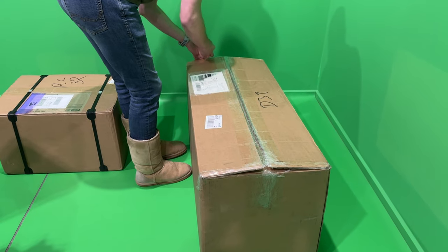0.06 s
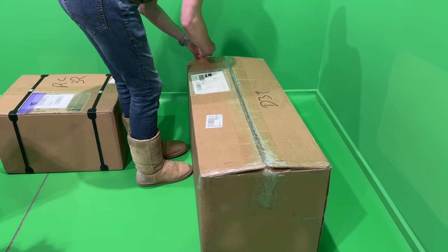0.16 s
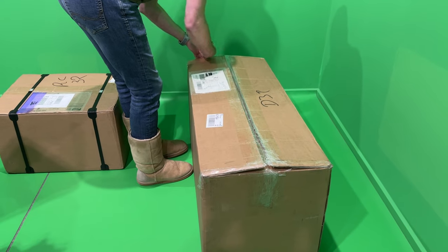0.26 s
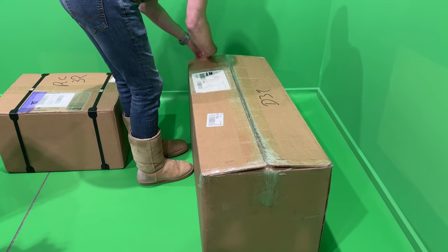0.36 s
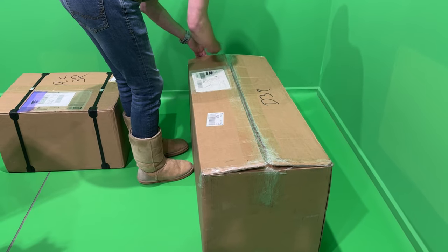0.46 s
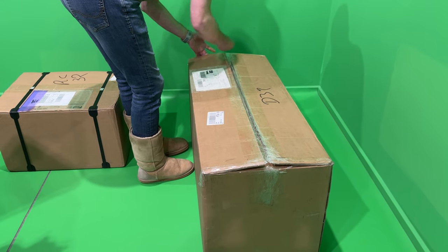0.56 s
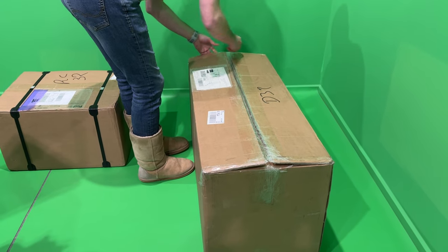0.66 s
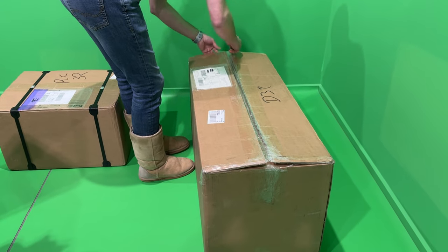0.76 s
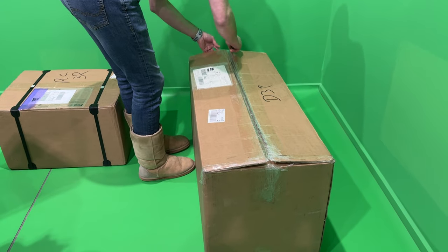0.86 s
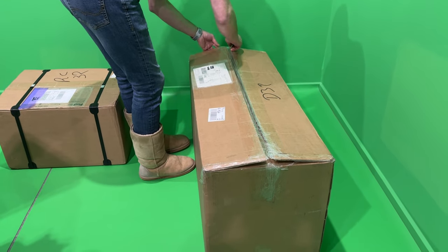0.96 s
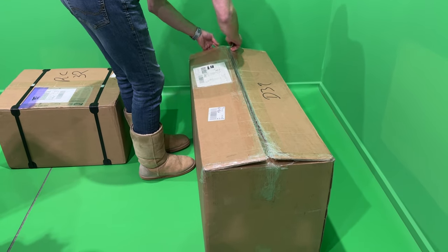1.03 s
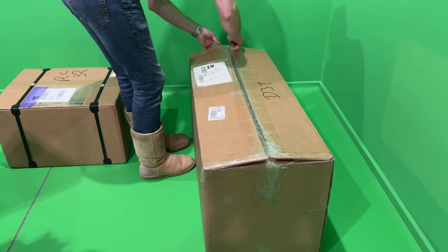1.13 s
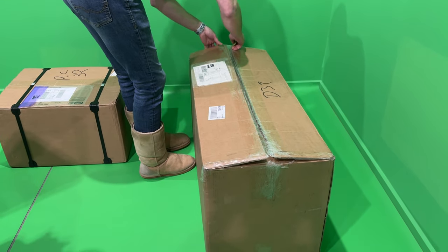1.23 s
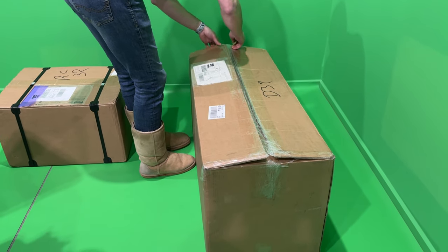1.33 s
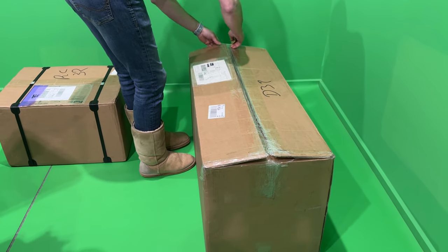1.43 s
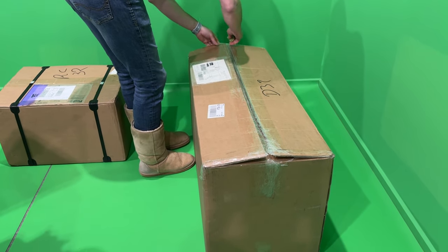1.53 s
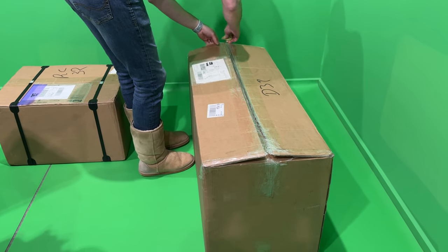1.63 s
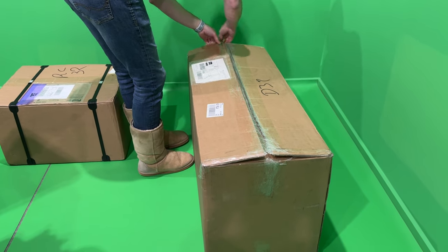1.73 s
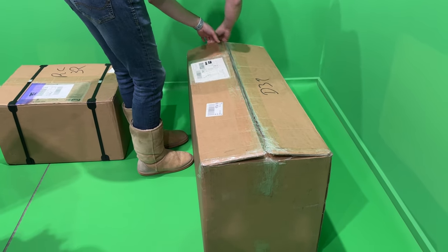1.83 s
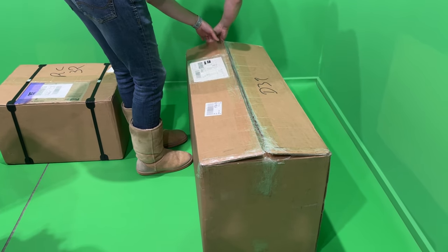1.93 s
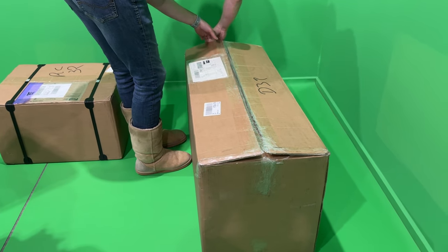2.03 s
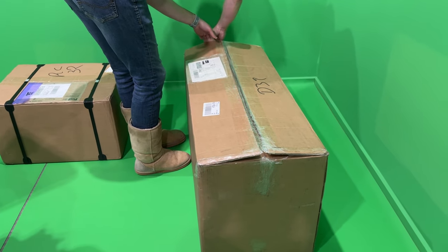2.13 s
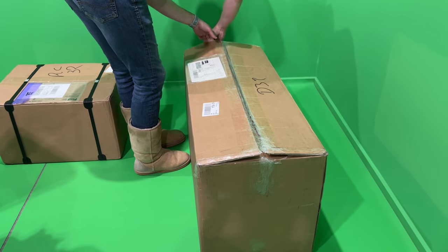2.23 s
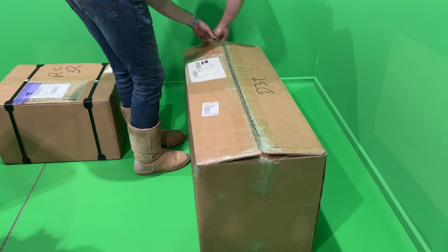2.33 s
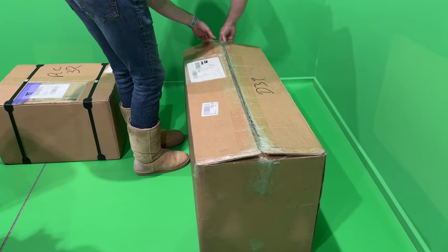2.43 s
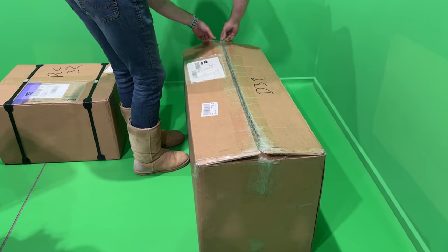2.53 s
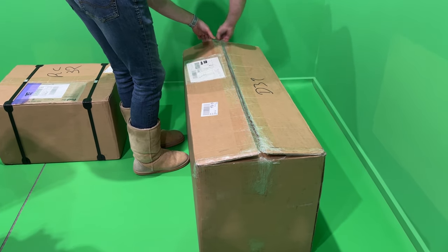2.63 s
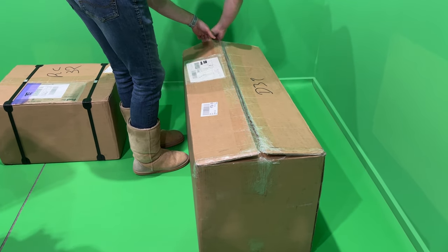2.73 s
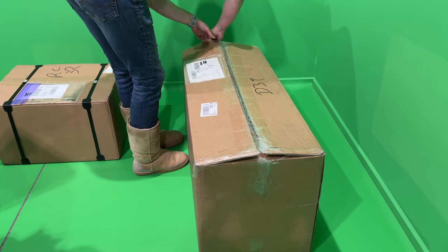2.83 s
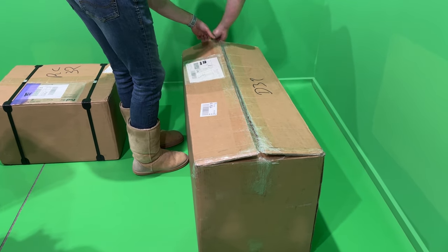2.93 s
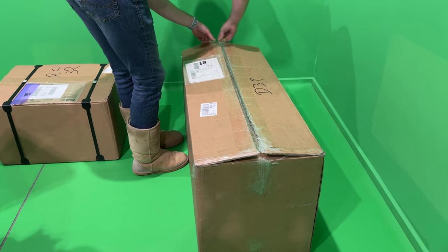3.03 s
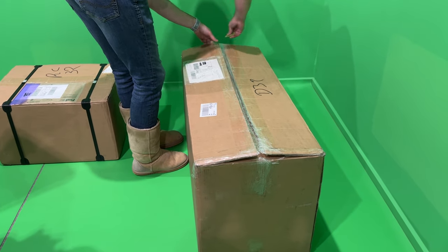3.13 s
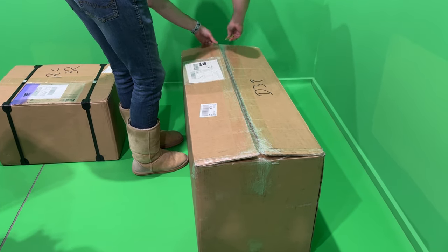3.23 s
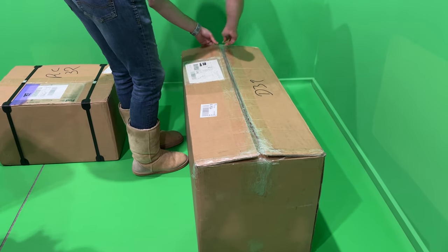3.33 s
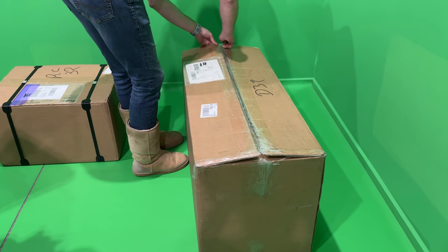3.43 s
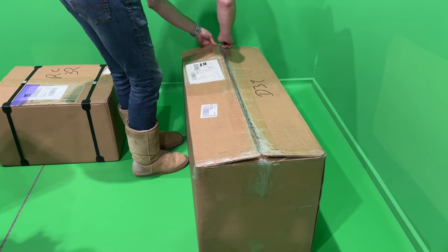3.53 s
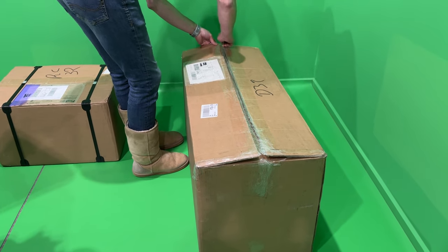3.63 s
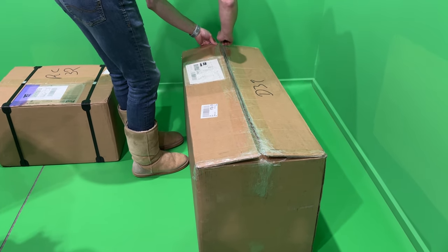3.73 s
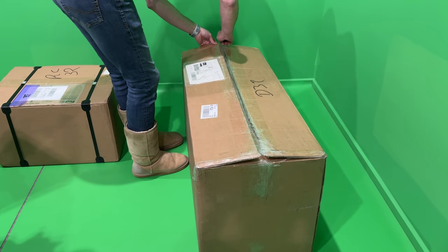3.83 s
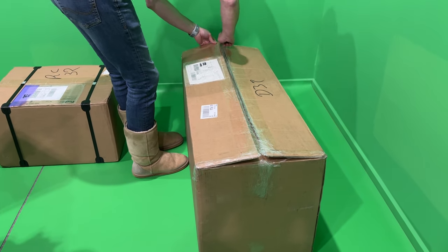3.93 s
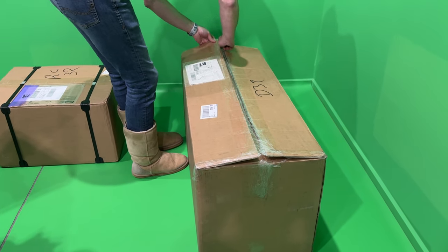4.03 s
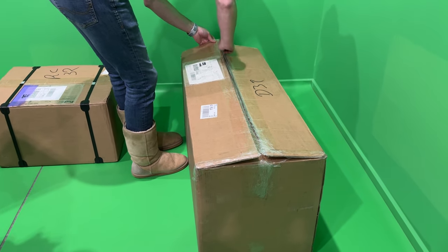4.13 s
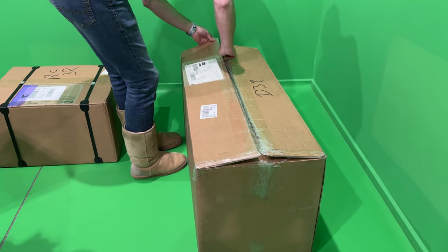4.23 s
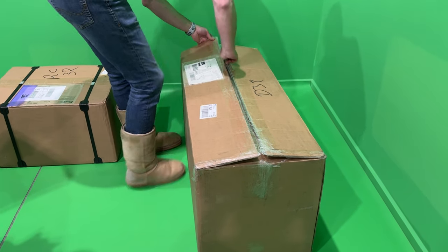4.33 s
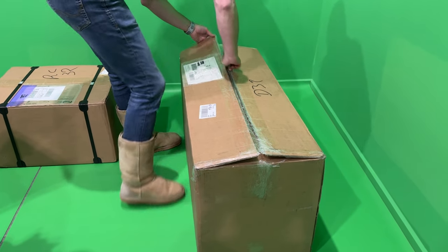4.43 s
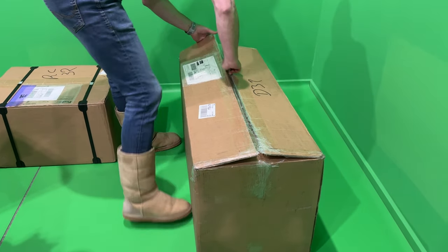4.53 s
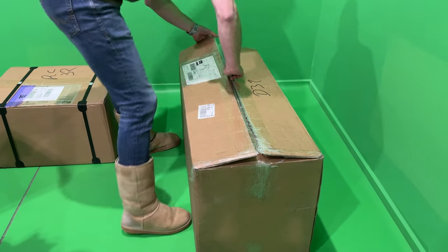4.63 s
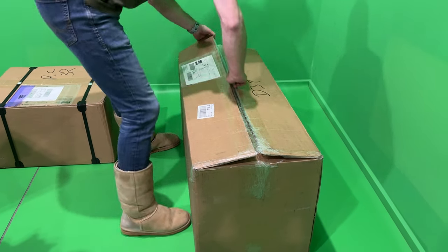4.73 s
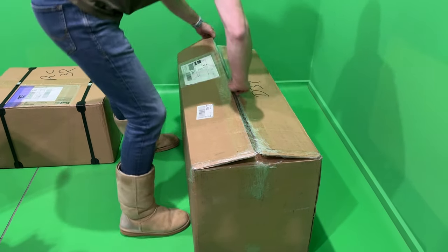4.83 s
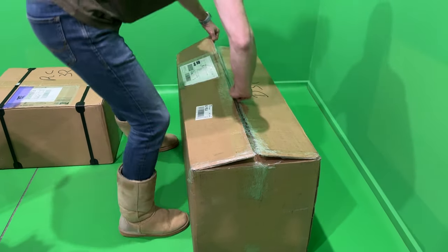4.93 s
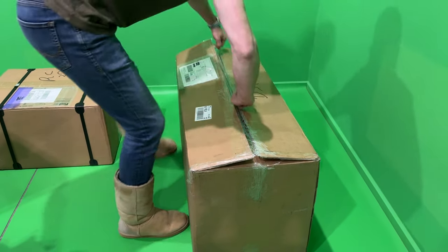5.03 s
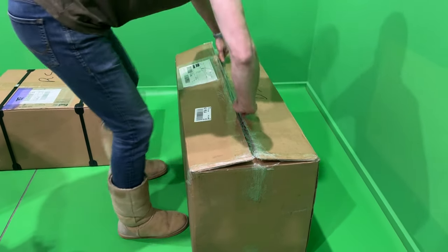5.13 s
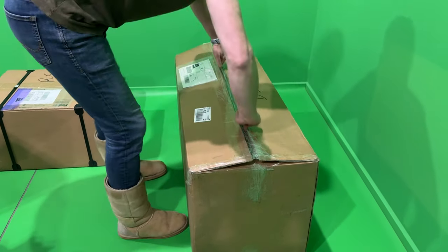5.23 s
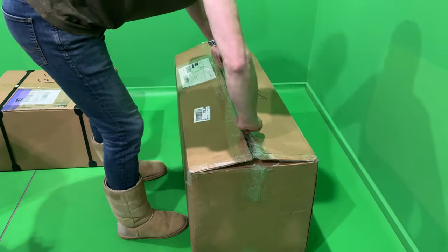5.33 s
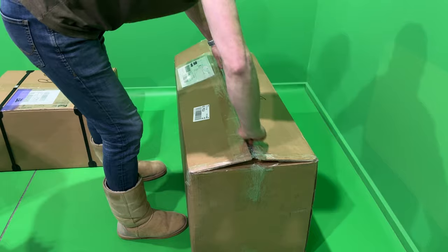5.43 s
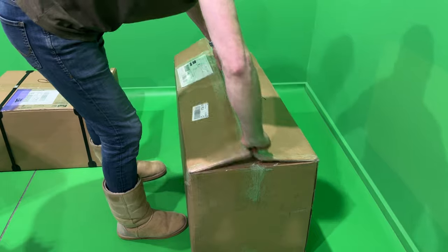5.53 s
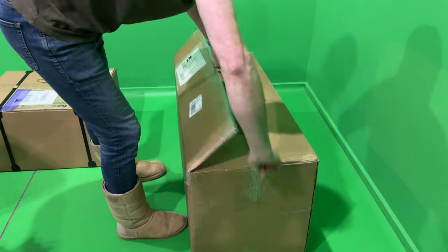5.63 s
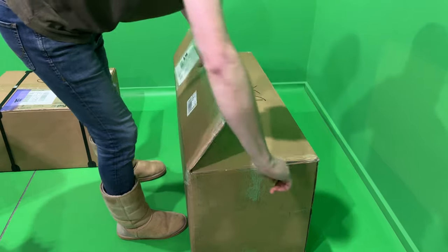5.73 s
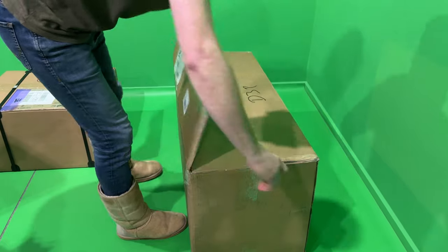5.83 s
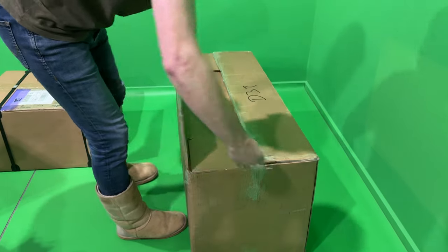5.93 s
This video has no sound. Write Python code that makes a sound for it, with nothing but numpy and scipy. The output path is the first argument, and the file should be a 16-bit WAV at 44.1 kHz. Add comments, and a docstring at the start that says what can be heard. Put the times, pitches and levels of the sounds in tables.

```python
"""Small scratchy rubs and clicks grow into loud cracking snaps with hollow booms, over a low steady hum.
Fingers pick at the tape on a big cardboard box, then a fist runs down the seam and the flaps lift.
Snaps are short bursts of noise, rubbing is a stream of grains and booms are slow pushes of air;
all of them ring resonances of the box. A small bare room rings after it, with ventilation behind;
a phone with two ports listens."""
import sys
import numpy as np
from scipy import signal
from scipy.fft import rfft, irfft, next_fast_len
from scipy.io import wavfile

SR = 44100
rng = np.random.default_rng(int(sys.argv[2]) if len(sys.argv) > 2 else 0)


def unload_audio(sound):
    """Save the sound as a 16-bit wav file, at the path given as the first command line argument."""
    columns = np.transpose(np.atleast_2d(sound))
    # keep every value between -1 and 1, then stretch to whole-number steps
    steps = np.round(np.clip(columns, -1, 1) * 32767)
    wavfile.write(sys.argv[1], SR, steps.astype(np.int16))


N = 263277      # length in samples

# tape letting go: t/s, base level/dB, brightness/dB, knock/dB, thump/dB, board pitch/Hz, thump pitch/Hz,
# tear decay time/ms, shudder/dB; brightness, knock, thump and shudder are relative to the base level
TAPE_SNAPS = [(0.5231, -51.5, 2, -23, -16, 926, 148, 2.9, -16),
              (0.8378, -31.5, -10.5, -16, -12, 2610, 170, 2.5, -21),
              (0.9266, -51, -3, -17, 8, 1810, 147, 3.3, -20.5),
              (0.9889, -32, -6.5, -29, -32, 1730, 108, 2.8, -15),
              (1.1334, -49, -1.5, -18, -7, 1790, 218, 4.2, -19),
              (1.26, -30.5, -9, -11, -9, 1360, 212, 3.2, -19),
              (1.29, -34.5, -14, -12.5, -6.5, 902, 270, 3.6, -19),
              (1.4262, -45, -5, -24, 3, 1670, 148, 4.3, -20),
              (1.5334, -49, -5.5, -25, -13, 2420, 145, 3.6, -31),
              (1.5829, -47.5, 3.5, -19, -13, 2440, 91.5, 3.3, -13),
              (1.7979, -64.5, 9.5, -14, 9, 1400, 132, 3.1, -22),
              (2.0244, -55.5, -2, -17, -9, 1390, 135, 2.8, -19),
              (2.141, -52, -9.5, -20, -6, 960, 86.1, 2.2, -19),
              (2.2548, -46.5, -8, -21, -32, 2410, 86.1, 3.4, -22),
              (2.3298, -32, -15.5, -12, -5, 1530, 99.6, 4.4, -14),
              (2.3381, -17.5, -15.5, -16.5, -9, 1240, 282, 3.13, -13),
              (2.7273, -36, -9.5, -19, -38, 1350, 86.1, 4, -22),
              (2.798, -32, -18.5, -6, -1.5, 1040, 124, 4.8, -16.5),
              (3.1464, -57, 2, -10, 1, 1710, 88.8, 6, -14),
              (3.1837, -59.5, 8.5, -7, -11, 1640, 86.1, 3.9, -17),
              (3.423, -48, -21, -14, -4.5, 1070, 152, 4.2, -25),
              (3.6862, -66.5, 12, -19, -12, 1560, 84.6, 2.5, -19),
              (3.709, -47, -3, -20, -29, 1620, 127, 2.7, -19),
              (3.7187, -37.5, -8, -25, -37, 1560, 85, 3.4, -23),
              (3.889, -50.5, -3, -11, -13, 1440, 275, 3, -24),
              (3.9332, -6, -13.5, -17.5, -21.5, 1400, 323, 3.74, -18.5),
              (3.9602, -3.5, -11, -18, -16, 1920, 154, 2.86, -19.5),
              (3.9808, -6.5, -17, -17.5, -22, 1510, 185, 3.3, -20),
              (4.1803, -23.5, -28, -29, -34, 1750, 116, 3.4, -17),
              (4.2297, -27, -8.5, -12, -10.5, 920, 283, 4.1, -20),
              (4.3134, -34.5, -12, -11, -2, 1025, 135, 5.5, -22),
              (4.3764, -10, -9.5, -13.5, -15, 1440, 134, 3.4, -20.5),
              (4.4348, -20, -11.5, -15.5, -12.5, 1720, 113, 2.8, -25),
              (4.5137, -37.5, 0, -10, -19, 2050, 156, 3.6, -26),
              (4.5505, -32.5, -10, -16, -4, 1850, 123, 3.6, -28),
              (4.5816, -30, -5, -11.5, -9, 929, 124, 1.6, -23),
              (4.6204, -28.5, -19, -38, -24, 1250, 91.5, 4.2, -15),
              (4.6655, -25, -17.5, -18.5, -3.5, 1270, 130, 3.6, -17),
              (4.7131, -37, -15, 2.5, 2, 1240, 153, 6.1, -18),
              (4.8307, -52.5, 14, -10, -25, 1640, 86.1, 2.7, -21),
              (4.9395, -53.5, 5, -17, -34, 1650, 135, 3.6, -22),
              (4.994, -24, -16.5, -21, -27, 1600, 120, 3.9, -18),
              (5.1141, -24.5, -22.5, -19, -13, 1590, 122.3, 3.4, -21),
              (5.2104, -31.5, -6.5, -6, -2.5, 1500, 155, 2.8, -19.5),
              (5.3686, -15.5, -10.5, -9, -2.5, 1700, 121, 2.15, -19),
              (5.5478, -15, -7.5, -13.5, -3.5, 1590, 174, 3.9, -17.5),
              (5.5584, -8.5, -45, -11, -6.5, 1540, 121, 3.95, -18.5)]
# resonances of each part of the box, all with columns: f/Hz, width/Hz, relative level/dB
# bright scuffing and the fizz above it
SCUFF_MODES = [(2830, 210, 2.5), (3735, 480, -3), (4770, 1540, -3.5), (5720, 1220, -2.5), (8346, 2000, 1.5)]
SIZZLE_MODES = [(8584, 1900, 10), (12050, 2560, 3), (12800, 8700, -3.5)]
# rattle of the corrugated board: f/Hz, width/Hz, relative level/dB
BOARD_MODES = [(1018, 101, 3), (1158, 61, -4.5), (1223, 41, -3.5), (1443, 336, 3), (1668, 95, 2.5),
               (1792, 130, 0.5), (1946, 110, -3.5), (2138, 140, -1.5), (2386, 470, -6)]
# knock of the box walls: f/Hz, width/Hz, relative level/dB
WALL_MODES = [(446, 23, -3.5), (518, 185, -2), (669, 130, -3), (765, 160, -4), (902, 10, -7.5)]
# thump of the large panels: f/Hz, width/Hz, relative level/dB
PANEL_MODES = [(90.6, 5.1, 1.5), (125, 13.7, 3), (157, 19.3, -4), (198, 16.4, -2.5), (268.3, 39.4, -1.5),
               (318, 69, -6)]
# air in the hollow box: f/Hz, width/Hz, relative level/dB
HOLLOW_MODES = [(48.7, 8.1, 5), (60, 9.3, -21)]


def snaps():
    """Every snap is a short dying tear of noise for the stiff parts and a soft push for the panels."""
    rise_share = 0.25       # rise time as a share of the tear's decay time
    sizzle_tilt = 1.4       # dB of sizzle per dB of brightness
    size = SR // 10
    t = np.arange(size) / SR
    s, db, bright_db, knock_db, thump_db, board_hz, thump_hz, tear_ms, _ = np.transpose(TAPE_SNAPS)
    age = 1000 * t / tear_ms[:, None, None]     # in decay times
    outline = (1 - np.exp(-age / rise_share)) * np.exp(-age)
    tears = rng.standard_normal((len(s), 2, size)) * outline
    for _ in range(3):      # a tear is even in colour: no pitch stands out
        spectrum = rfft(tears)
        even = irfft(spectrum / np.abs(spectrum), size)
        tears = even * outline ** 0.16
    wanted_energy = np.sum(outline ** 2, axis=-1, keepdims=True)
    energy = np.sum(tears ** 2, axis=-1, keepdims=True)
    tears = tears * np.sqrt(wanted_energy / energy)

    # the size of the torn patch favours a band of its own, a little under an octave wide
    patches = []
    for hz, tear in zip(board_hz, tears):
        b, a = signal.butter(2, [0.72 * hz, 1.304 * hz], "band", fs=SR)
        patches.append(signal.lfilter(b, a, tear))
    push = t / 0.00064 * np.exp(1 - t / 0.00059)
    thumps = []
    for hz in thump_hz:
        b, a = signal.butter(1, [0.56 * hz, 1.5 * hz], "band", fs=SR)
        thumps.append(signal.lfilter(b, a, push))

    parts = [(BOARD_MODES, db + 5.5, patches),
             (SCUFF_MODES, db + bright_db + 13.5, tears),
             (SIZZLE_MODES, db + sizzle_tilt * bright_db + 15.0, tears),
             (WALL_MODES, db + knock_db + 10.5, tears),
             (PANEL_MODES, db + thump_db + 1.0, thumps)]
    return sum(resonate(placed(s, level_db, shapes), modes, uneven_db=2.5)
               for modes, level_db, shapes in parts)


def booms():
    """The whole box flexes and pumps its air: a slow push rings the resonances of the hollow."""
    # pushes on the air: t/s, level/dB
    air_pushes = [(0.93, -50), (1.748, -48), (2.4, -48), (4.02, -39), (4.299, -40.5), (4.388, -33.5),
                  (4.45, -64), (4.58, -56), (4.679, -41), (5.15, -42), (5.29, -39), (5.376, -28),
                  (5.431, -26), (5.556, -23.5), (5.801, -51)]
    t = np.arange(SR // 10) / SR
    s, db = np.transpose(air_pushes)
    push = t / 0.0046 * np.exp(1 - t / 0.0027)
    return resonate(placed(s, db - 2.5, [push] * len(s)), HOLLOW_MODES, uneven_db=4.5)


def rubbing():
    """Fibres and glue give way in clumps of uneven grains; the same friction shakes the panels."""
    # hands and flaps rubbing throughout: t/s, rustle level/dB, load on the box relative to the rustle/dB
    rub_path = [(0.0, -71, 14.5), (0.45, -96.5, 27.5), (0.71, -63.5, 4), (1.03, -56, 4), (1.49, -61.5, 5.5),
                (1.89, -69.5, 7), (2.39, -74, 12), (2.58, -83, 13.5), (3.42, -66.5, 7), (3.72, -82, -7),
                (3.94, -58, 14), (4.09, -43.5, 3.5), (4.42, -46, 6.5), (4.75, -50, 5.5), (5.2, -51, 0.5),
                (5.54, -40.5, 9), (5.7, -54.5, 8), (5.97, -44.5, -4)]
    # single strokes of a hand: middle t/s, length/s, rustle level/dB, load relative to the rustle/dB
    hand_strokes = [(0.345, 0.017, -71, 4), (0.684, 0.089, -54, 1.5), (0.828, 0.029, -65, 8),
                    (1.018, 0.058, -54.5, -11), (1.446, 0.045, -44.5, -2), (2.035, 0.022, -54, -19),
                    (2.152, 0.028, -60, 7), (2.3, 0.052, -55.5, -8), (2.93, 0.12, -63.5, 3),
                    (3.272, 0.06, -51, -3), (3.451, 0.046, -59.5, 13.5), (3.74, .06, -80, 6),
                    (3.94, 0.066, -37, 0.5), (4.218, 0.044, -41, 2), (4.324, 0.043, -42.5, 8.5),
                    (4.595, 0.05, -48.5, 10.5), (4.71, 0.077, -57, 20.5), (5.15, 0.075, -43.5, 9.5),
                    (5.256, 0.077, -55, 17.5), (5.407, 0.079, -37, 1.5), (5.62, 0.073, -50.5, 18.5)]
    # how strongly rubbing drives each part: part name, level/dB
    mix_db = {"sizzle": 3, "board": -6, "wall": -9, "panel": -5, "hollow": -2}
    grains_per_s, grain_spread_db, clump_db = 1200, 3.5, 7     # typical rate, uneven sizes, uneven rate
    shudder_s = 0.032       # decay time of the board's shudder after a snap
    t = np.arange(N) / SR
    s, rustle_db, load_db = np.transpose(rub_path)
    rustle = from_db(np.interp(t, s, rustle_db))
    load = from_db(np.interp(t, s, rustle_db + load_db))
    for middle, length, db, load_db in hand_strokes:
        swell = from_db(db) * np.exp(-(2 * (t - middle) / length) ** 2)
        rustle = rustle + swell
        load = load + swell * from_db(load_db)

    # after each snap the box goes on shuddering
    s, db, bright_db, knock_db, thump_db, *_, shudder_db = np.transpose(TAPE_SNAPS)
    db = db + shudder_db
    dying = [np.exp(-t[:SR // 2] / shudder_s)] * len(s)
    shudder = placed(s, db, dying)
    heavy = placed(s, db + thump_db + 19.5, dying)
    knocking = placed(s, db + knock_db + 19.5, dying)
    rustle = rustle + placed(s, db + bright_db + 0.5, dying)

    # grains fall at chance moments, up or down, with a few much bigger than the rest
    sizes = from_db(grain_spread_db * np.minimum(rng.exponential(1, (2, N)), 4))
    sizes = sizes * rng.choice([-1, 1], (2, N))
    per_s = grains_per_s * from_db(clump_db * drift(35.0, count=1))
    grains = rms_one(sizes * (rng.random((2, N)) < per_s / SR))

    out = resonate(grains * rustle, SCUFF_MODES, uneven_db=0.0)
    parts = [(SIZZLE_MODES, "sizzle", rustle),
             (BOARD_MODES, "board", load + shudder),
             (WALL_MODES, "wall", load + knocking),
             (PANEL_MODES, "panel", load + heavy),
             (HOLLOW_MODES, "hollow", load)]
    for modes, name, force in parts:
        out = out + resonate(grains * force * from_db(mix_db[name]), modes, uneven_db=2.0)
    return out


def room(x):
    """Direct sound, then a diffuse tail of noise that dies at its own pace in each half-octave band."""
    # ringing of the room: f/Hz, time to fall 60 dB/s, tail level/dB
    ringing = [(50.3, 0.41, -4.5), (162, 0.24, -6), (453, 0.4, 0), (1060, 0.34, -3), (3030, 0.54, 3.5),
               (8100, 0.54, -5.5), (14900, 0.22, 2)]
    build_up_s = 0.0011     # the tail fades in over this time
    size = SR
    t, tail = np.arange(size) / SR, 0
    for low in 30 * np.sqrt(2) ** np.arange(18):
        band = signal.butter(2, [low, low * np.sqrt(2)], "band", fs=SR, output="sos")
        decay = from_db(-60 * t / at_hz(ringing, low * 1.67))
        noise = signal.sosfilt(band, rng.standard_normal((2, size)))
        part = noise * decay * np.clip(t / build_up_s, 0, 1)
        level = from_db(at_hz(ringing, low * 0.63, column=2))
        tail = tail + level * part / np.sqrt(np.sum(decay ** 2))
    long = next_fast_len(N + size)
    direct = np.array([[1], [1j]])      # the difference of two close ports is a quarter cycle off their sum
    response = two_ports(direct + rfft(tail, long), np.fft.rfftfreq(long, 1 / SR))
    return irfft(response * rfft(x, long), long)[:, :N]


def ventilation():
    """A steady low rumble with a soft rush of air near 1.5 kHz, made of noise shaped in pitch."""
    # colour of the hum: f/Hz, relative level/dB
    hum_colour = [(25, -34), (50, -5), (76, 0.5), (108, -22), (141, -3.5), (175, -19), (350, -19),
                  (560, -26.5), (850, -29.5), (1200, -23.5), (2000, -24.5), (2600, -45), (3600, -46),
                  (16000, -46)]
    hum_db = -53.5      # average (RMS) level of the hum
    hz = np.fft.rfftfreq(N, 1 / SR)
    pair = rfft(rng.standard_normal((2, N))) * from_db(at_hz(hum_colour, hz))
    return from_db(hum_db) * rms_one(irfft(two_ports(pair, hz), N))


def two_ports(spectrum_of_pair, hz):
    """Mixes two spectra into left and right with the likeness and tilt of each pitch."""
    # how alike left and right are: f/Hz, likeness (0 to 1)
    likeness = [(40, 1), (130, 0.95), (290, 0.84), (640, 0.31), (1410, 0.36), (3100, 0.024), (6820, 0.42)]
    # balance of the two ports: f/Hz, left minus right/dB
    balance = [(60, -0.5), (110, -1.0), (200, -0.5), (380, -0.5), (700, -1.0), (1290, -2.5), (2380, -2.5),
               (4400, 2.0), (8120, 0.5), (15000, 0.0)]
    alike = np.clip(at_hz(likeness, hz), 0, 1)
    tilt = from_db(at_hz(balance, hz) / 2)
    mid = np.sqrt((1 + alike) / 2) * spectrum_of_pair[0]
    side = np.sqrt((1 - alike) / 2) * spectrum_of_pair[1]
    return np.array([(mid + side) * tilt, (mid - side) / tilt])


def resonate(x, modes, uneven_db):
    """Parallel resonances of alternating sign; as the contact wanders it drives each one more or less."""
    out, power = 0, 0
    wanders = drift(15.1, count=len(modes))
    for k, ((hz, width_hz, db), wander) in enumerate(zip(modes, wanders)):
        r = np.exp(-np.pi * width_hz / SR)
        b = np.array([1, 0, -1]) * (1 - r * r) / 2
        a = [1, -2 * r * np.cos(2 * np.pi * hz / SR), r * r]
        force = x[k % len(x)] * from_db(db + uneven_db * wander)     # the rows of x take turns
        out = out + (-1) ** k * signal.lfilter(b, a, force + 1e-18)
        power += from_db(db) ** 2 * (1 - r * r) / 2
    # little sounds outside the span of the modes
    edges_hz = [0.82 * modes[0][0], min(1.287 * modes[-1][0], .45 * SR)]
    span = signal.butter(2, edges_hz, "band", fs=SR, output="sos")
    return signal.sosfilt(span, out) / np.sqrt(power)


def drift(rate, count):
    """Slow chance of spread 1, one row for each of count users; a higher rate in Hz wanders faster."""
    r = np.exp(-80 * np.pi * rate / SR)     # one step lasts 40 samples
    steps = rng.standard_normal((count, N // 40 + 2002))
    slow = signal.lfilter([1], [1, -2 * r, r * r], steps)[:, 2000:]
    return np.repeat(slow / slow.std(axis=1, keepdims=True), 40, axis=1)[:, :N]


def placed(times, levels_db, shapes):
    """Lays each shape down at its moment and level."""
    out = np.zeros((2, N + SR))
    for s, db, shape in zip(times, levels_db, shapes):
        start = round(s * SR)
        out[:, start:start + np.shape(shape)[-1]] += from_db(db) * shape
    return out[:, :N]


def at_hz(points, hz, column=1):
    """Reads a spectrum table on a log-frequency axis."""
    points = np.array(points)
    return np.interp(np.log(hz + 1), np.log(points[:, 0]), points[:, column])


def from_db(db):
    """Turns decibels into a plain factor."""
    return 10 ** (np.asarray(db) / 20)


def rms_one(x):
    """Scales a sound to an average (RMS) level of 1."""
    return x / np.sqrt(np.mean(x ** 2) + 1e-20)


def scene():
    """All the handling noise in the room, over the hum."""
    return room(snaps() + booms() + rubbing()) + ventilation()


def record(dry):
    """The high treble comes from one port only, spread to both sides inverted and a third of a ms apart."""
    shared_above_hz, lag, cutoff_hz = 8250, 14, 16400      # lag in samples
    low = signal.cheby2(10, 40, shared_above_hz + 750, fs=SR, output="sos")
    high = signal.cheby2(10, 40, shared_above_hz - 750, "high", fs=SR, output="sos")
    treble = signal.sosfilt(high, dry[1])
    late = np.concatenate([np.zeros(lag), treble[:-lag]])
    both = signal.sosfilt(low, dry) + np.array([late, -treble])
    no_deep_bass = signal.butter(3, 36, "high", fs=SR, output="sos")
    both = signal.sosfilt(no_deep_bass, both)
    both = 0.96 * np.tanh(both / 1.453)     # loud peaks are rounded off
    no_top = signal.cheby2(14, 70, cutoff_hz, fs=SR, output="sos")
    return signal.sosfilt(no_top, both)


dry = scene()
out = record(dry)
unload_audio(out)
```